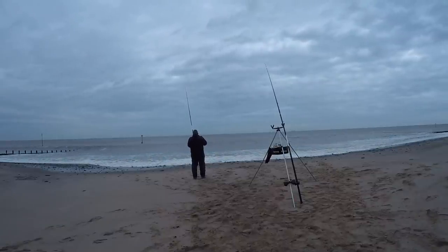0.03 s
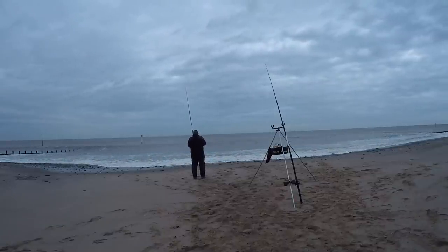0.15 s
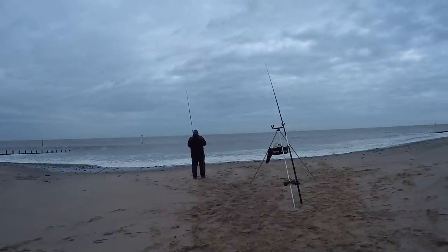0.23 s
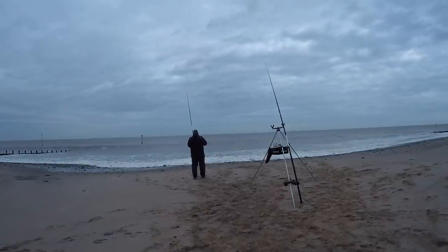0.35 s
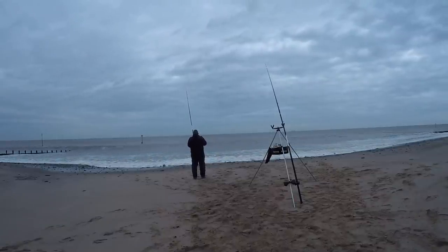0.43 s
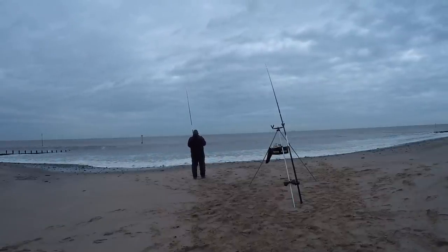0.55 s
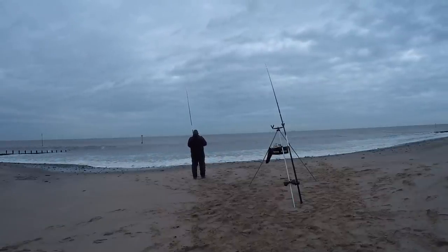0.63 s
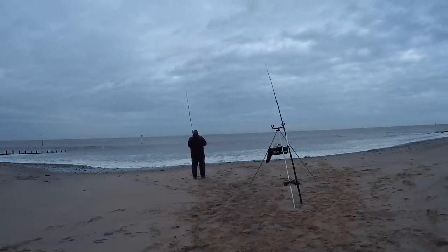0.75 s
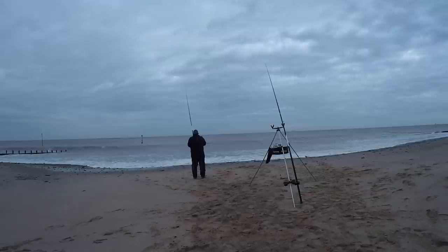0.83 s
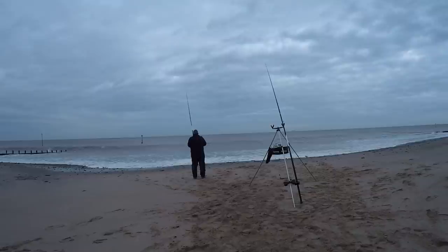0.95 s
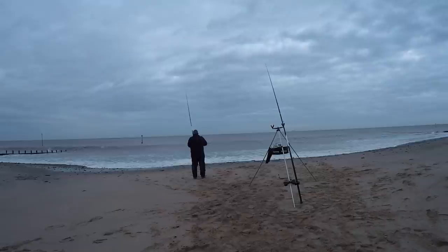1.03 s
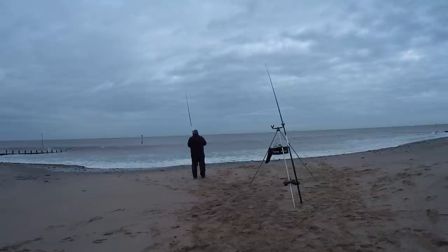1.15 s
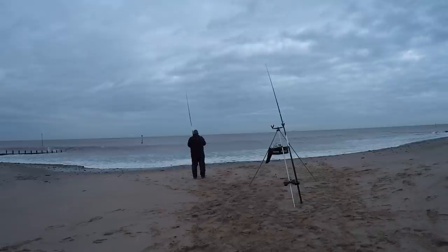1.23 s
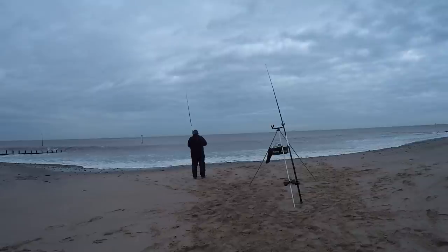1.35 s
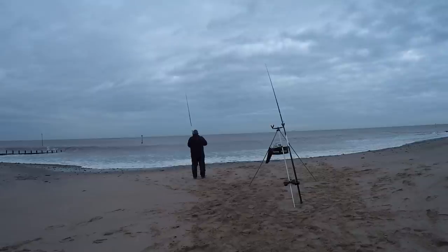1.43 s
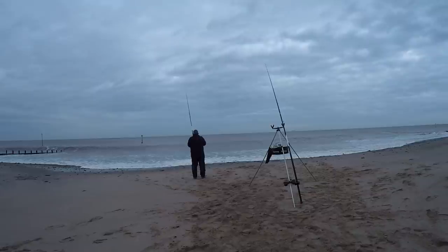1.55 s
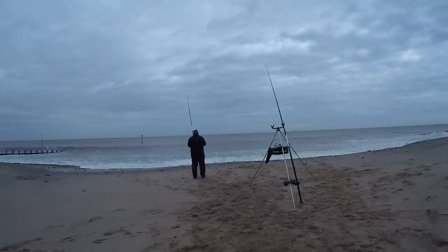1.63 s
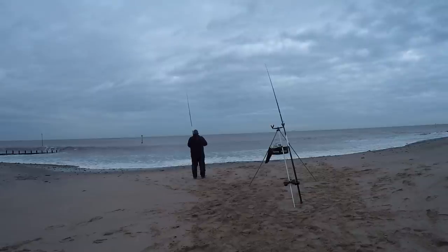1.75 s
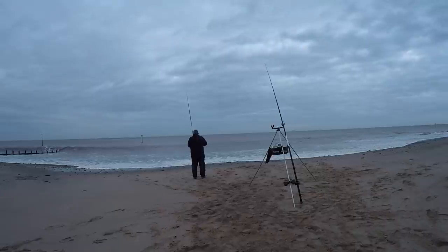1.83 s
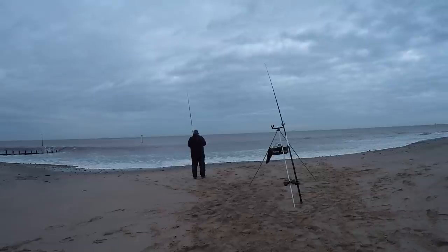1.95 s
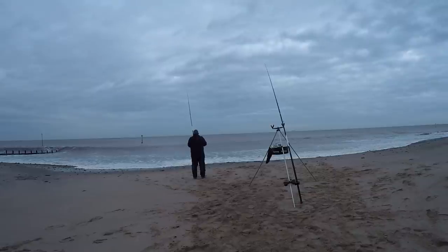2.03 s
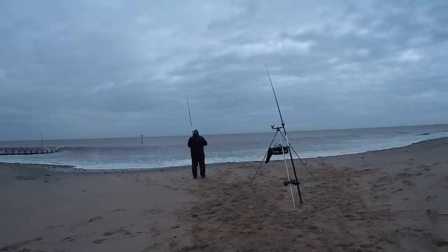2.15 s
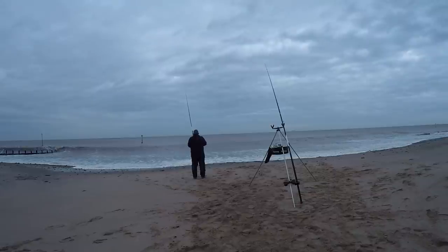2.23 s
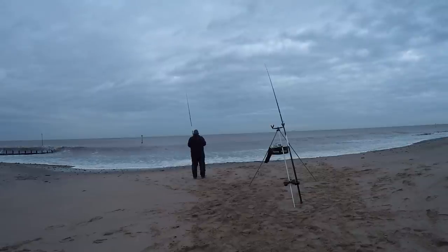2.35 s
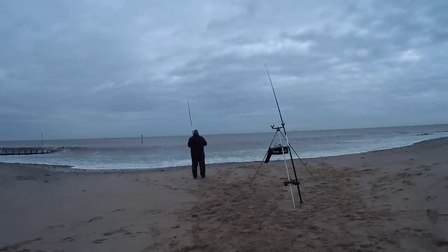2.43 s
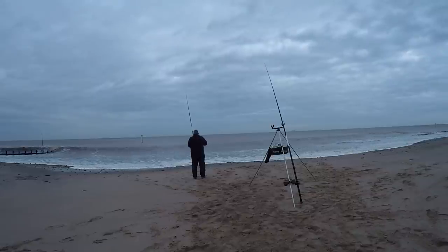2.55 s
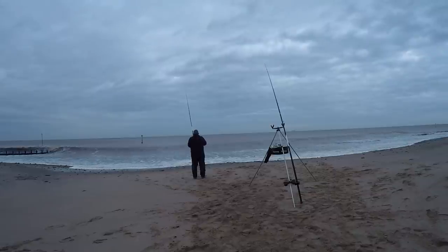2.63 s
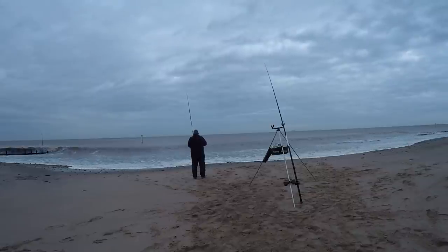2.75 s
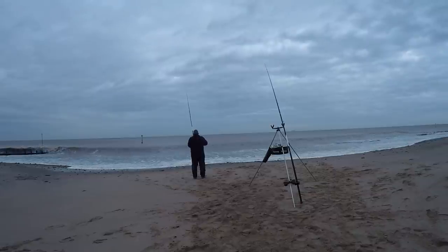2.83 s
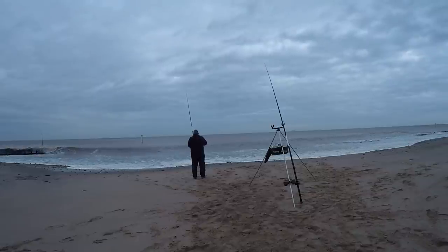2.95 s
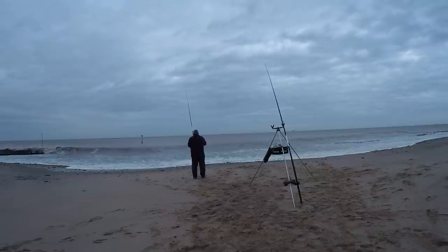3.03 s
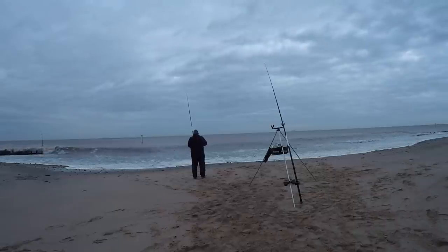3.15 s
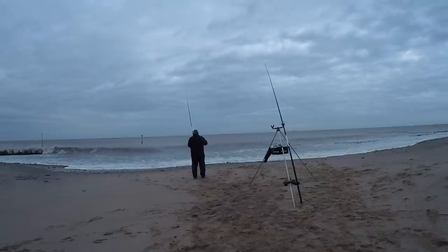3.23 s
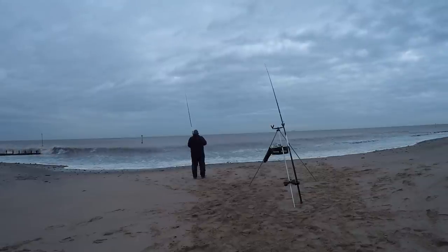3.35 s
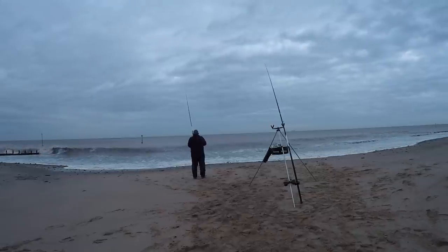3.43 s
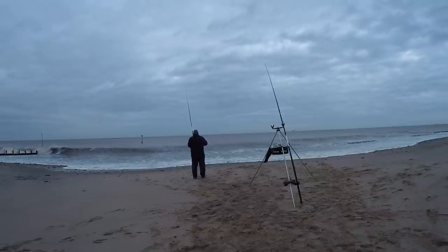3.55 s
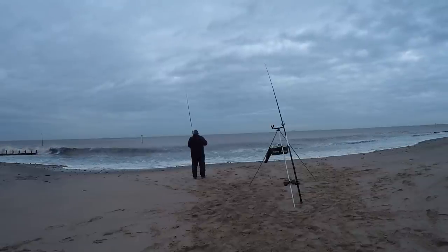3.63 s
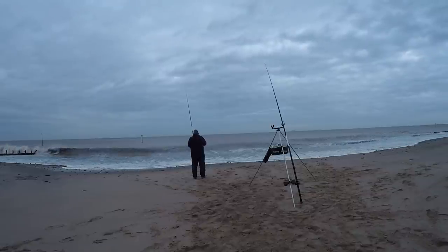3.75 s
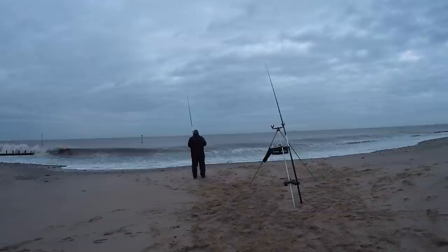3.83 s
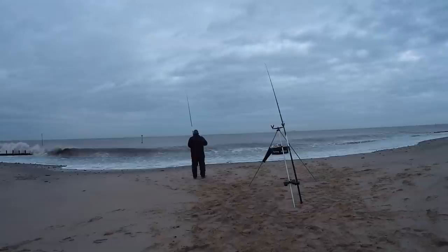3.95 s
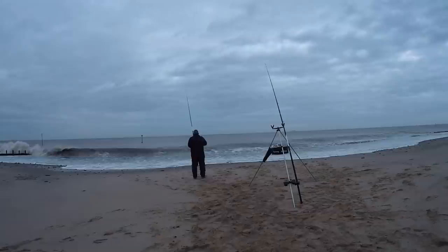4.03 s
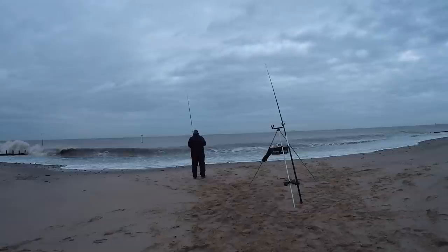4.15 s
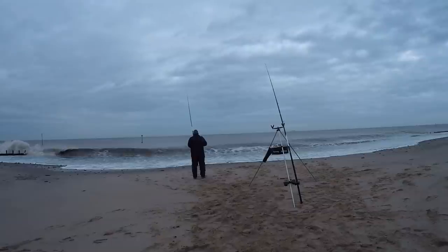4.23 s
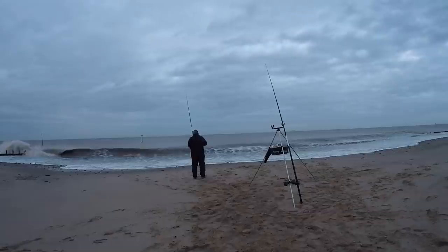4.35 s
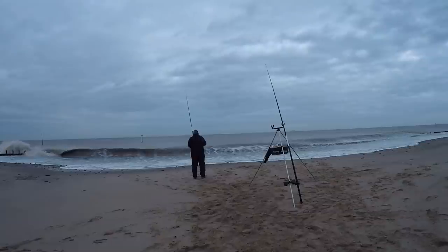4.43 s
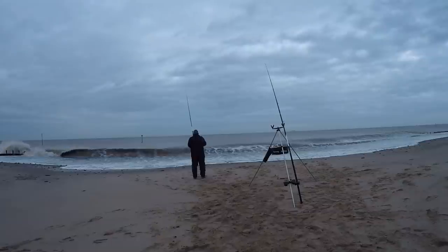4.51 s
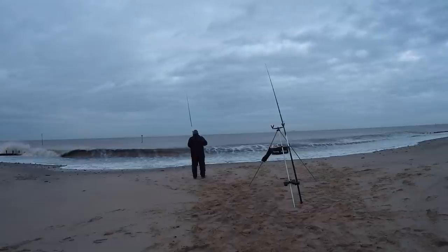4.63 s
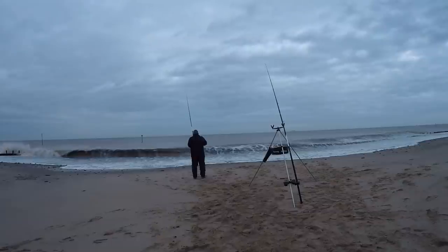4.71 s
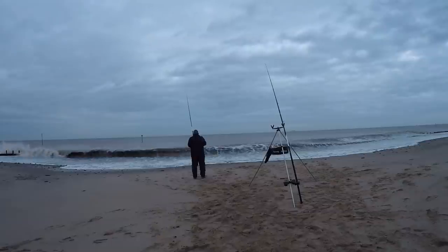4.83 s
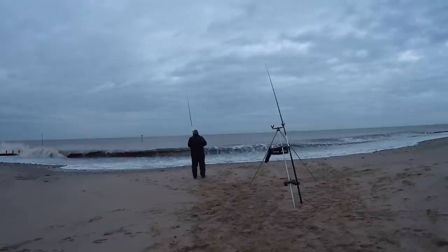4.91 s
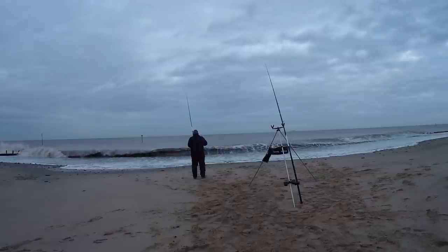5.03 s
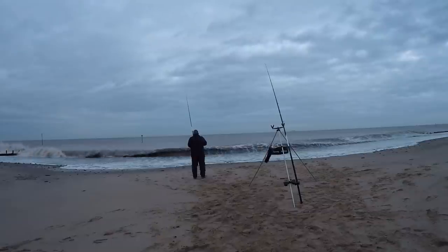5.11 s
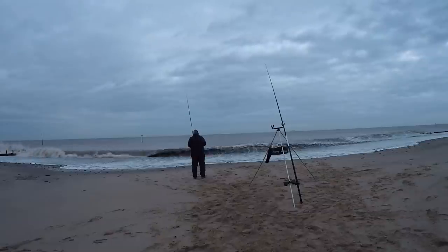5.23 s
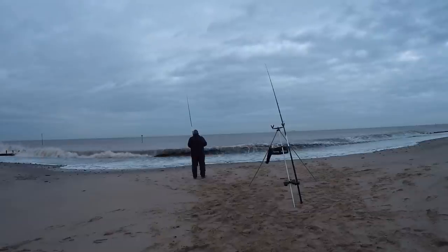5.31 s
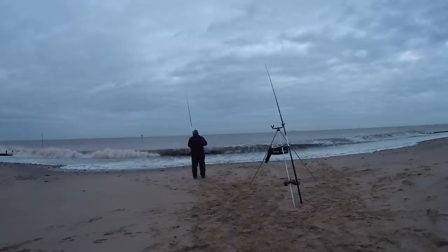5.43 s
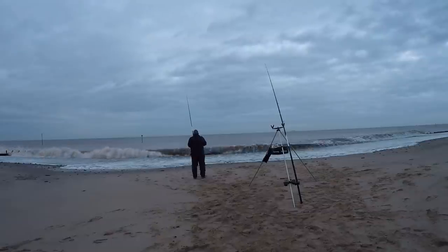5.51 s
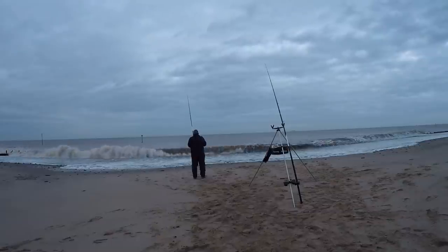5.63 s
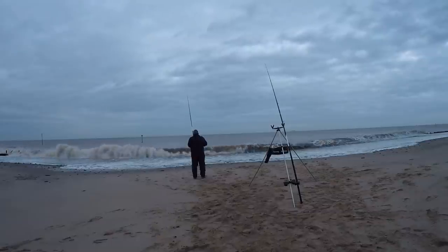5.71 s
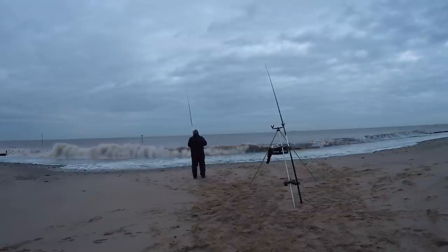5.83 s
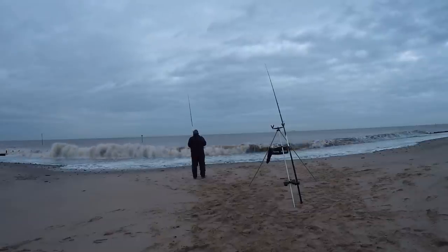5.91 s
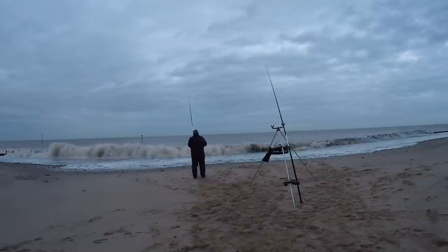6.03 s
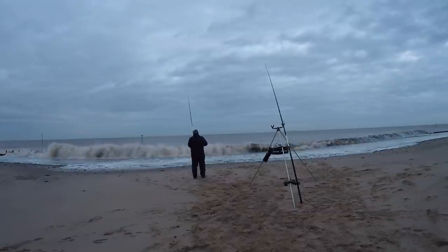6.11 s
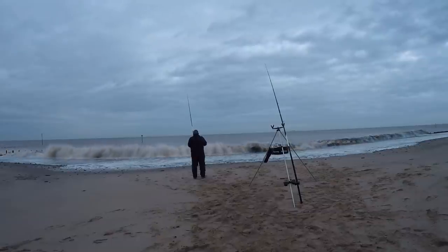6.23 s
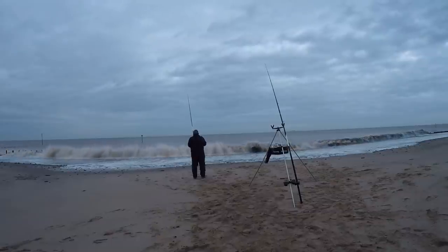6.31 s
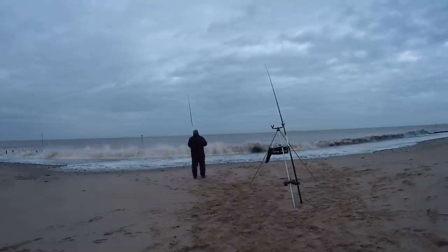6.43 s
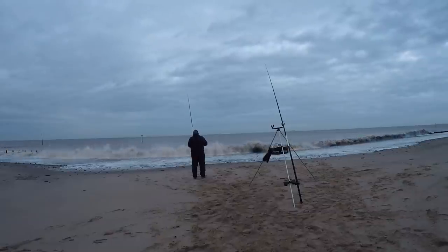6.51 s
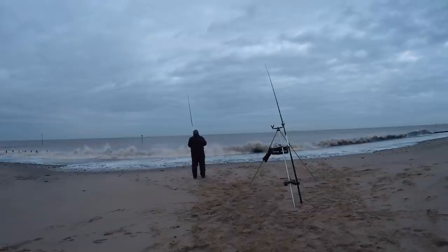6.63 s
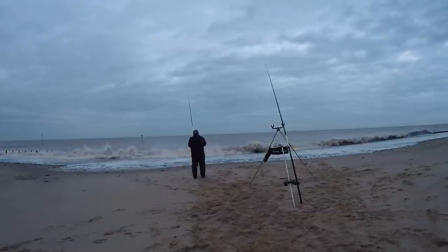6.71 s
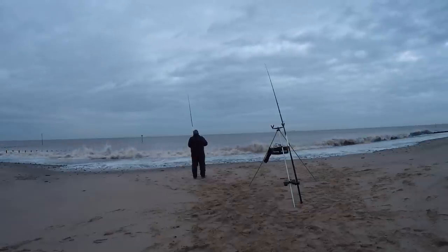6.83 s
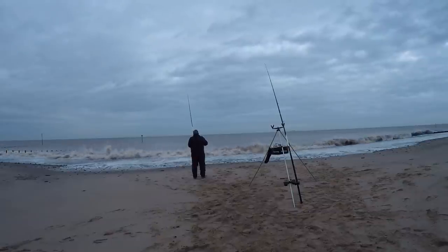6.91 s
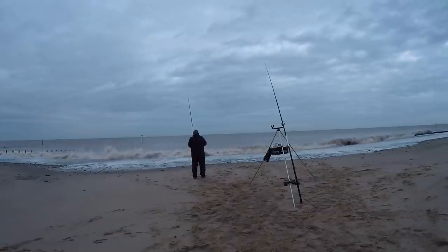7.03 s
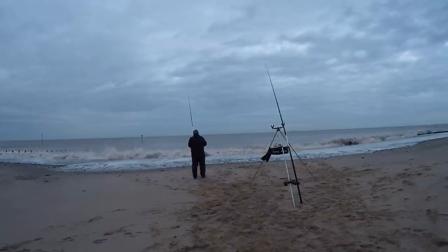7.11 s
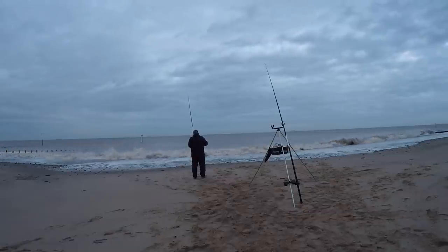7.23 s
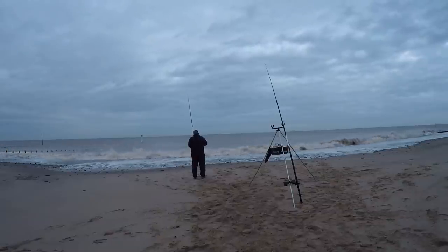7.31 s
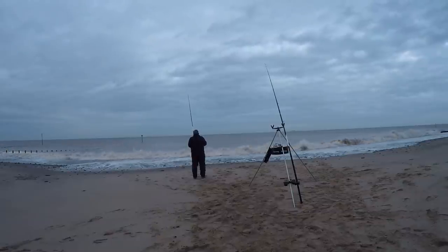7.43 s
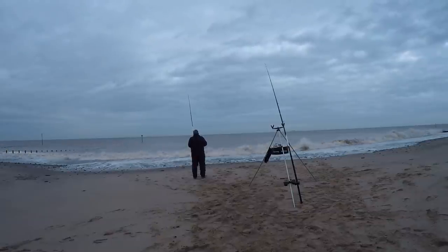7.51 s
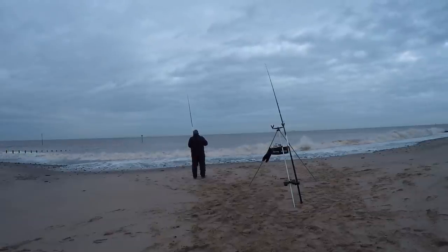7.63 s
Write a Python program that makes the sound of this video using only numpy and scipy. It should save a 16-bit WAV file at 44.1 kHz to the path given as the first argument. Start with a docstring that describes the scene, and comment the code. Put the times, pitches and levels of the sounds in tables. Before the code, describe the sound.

Low wind and surf rumble over a steady distant sea, then a wave slaps wood on the left and breaks along the beach in a foamy roar.

```python
"""An open sandy shore: wind and surf rumble on two close microphone ports over the steady far sea, as shaped noise.
Early on, a small bird chirps once, faintly, as three gliding tones.
A wave then slaps a groyne on the left, in short rushes of bubble pops, and breaks along the beach:
roar, crash, hiss and spray swell together, from clouds of dense pops in six bands.
The spray fades before the roar, and the wave ends towards the right."""
import sys
import numpy as np
from scipy import signal
from scipy.fft import rfft, irfft
from scipy.io import wavfile
from scipy.ndimage import uniform_filter1d

SR = 44100
rng = np.random.default_rng(int(sys.argv[2]) if len(sys.argv) > 2 else 0)


def gain_from_decibels(decibels):
    """Convert decibel values to linear amplitude factors."""
    exponent = np.asarray(decibels, float) / 20
    return 10 ** exponent


def generate_wav(sig):
    """Save sig (samples, or channels by samples) to the path in sys.argv[1] as 16-bit PCM at SR."""
    pcm = np.round(np.clip(np.atleast_2d(sig).T, -1, 1) * 32767).astype(np.int16)
    wavfile.write(sys.argv[1], SR, pcm)


N = 338247
T = np.arange(N) / SR  # seconds
HZ = np.maximum(np.arange(N // 2 + 1) * SR / N, 1)  # frequency of each spectrum bin
OPPOSITE = np.array([[1], [-1]])  # the same sound in opposite sign at the two ports


def shape(x, gain):
    """Linear filtering: multiply the spectrum by a gain over frequency."""
    return irfft(rfft(x) * gain, N)


def colour(points):
    """Spectral envelope: gain over frequency from (Hz, dB) points, straight in dB over log frequency."""
    hz, db = np.transpose(points)
    return gain_from_decibels(np.interp(np.log(HZ), np.log(hz), db))


def window(lo_hz, hi_hz, order=3):
    """Band-pass with soft edges: neighbouring bands add up to even power."""
    low_cut = 1 + (lo_hz / HZ) ** (2 * order)
    high_cut = 1 + (HZ / hi_hz) ** (2 * order)
    return 1 / np.sqrt(low_cut * high_cut)


def unit(x):
    """Normalisation to an rms of 1."""
    return x / np.sqrt(np.mean(x ** 2))


def walk(rate):
    """Slow random modulation: levels held 1 / rate seconds and smoothed twice, rms about 1."""
    hold = int(SR / rate)
    steps = np.repeat(rng.standard_normal(N // hold + 1), hold)
    return unit(uniform_filter1d(uniform_filter1d(steps, hold), hold)[:N])


def curves(table):
    """Linear interpolation in time: each column after the first, one value a sample."""
    s, *columns = np.transpose(table)
    return [np.interp(T, s, column) for column in columns]


def bubbles(share, scatter_db):
    """Shot noise: random pops of uneven size; share is the part of all samples that hold a pop."""
    pops = (rng.random(N) < share) * gain_from_decibels(scatter_db * rng.exponential(size=N))
    return pops * rng.standard_normal(N)


def foam():
    """Dense shot noise: pops so close that they nearly merge."""
    return bubbles(0.6, 1.3)


def spread(alike_hz, least):
    """Spatial coherence: the share that differs between ports grows as waves from a broad front get short."""
    ratio = (HZ / alike_hz) ** 4
    return np.sqrt(least ** 2 + ratio / (1 + ratio))


# Shading and phase at the ports, by direction. Each row: frequency in Hz, left port level in dB,
# right port level in dB, phase by which the left port lags in radians.
FROM_LEFT = [(1500, 0, 0, 0), (2900, -.5, -.5, .02), (4000, 1.5, 1.2, .13), (4800, 0, -2.5, .6),
             (5500, -1.5, -1.5, 1.), (6200, -1, -.5, .95), (7500, 1, 0, .7), (8700, 1, -4.5, 1.5),
             (9300, 1, -3, 2.8), (11500, 0, -1, 3.2), (15000, -2, 2, 3.2)]
FROM_RIGHT = [(1500, 0, 0, 0), (2700, -.3, .3, -.08), (4200, 0, 0, -.3), (6600, -1, .8, -.35),
              (8000, 0, .5, -.6), (9500, .5, -.5, -1.5), (15000, 0, 0, -1.5)]


def heard_from(near, direction):
    """Diffraction: the body around the ports changes level and phase according to direction."""
    hz, left_db, right_db, lag = np.transpose(direction)
    half_turn = np.exp(0.5j * np.interp(np.log(HZ), np.log(hz), lag))
    left = shape(near, colour(np.c_[hz, left_db]) / half_turn)
    right = shape(near, colour(np.c_[hz, right_db]) * half_turn)
    return np.array([left, right])


# Spectrum of the wave. Each row: frequency in Hz, relative density in dB per Hz.
WAVE_COLOUR = [(100, 3.5), (200, -2.5), (450, -7.5), (950, -13.5), (1400, -15.5), (1850, -18), (2500, -23),
               (4350, -26), (5500, -28.5), (7200, -33.5), (9500, -40.5), (11000, -41.5), (13500, -50),
               (15000, -60)]
# Bands of the bubble clouds, big bubbles to small. Each row: lower edge in Hz, upper edge in Hz.
WAVE_HZ = [(150, 450), (450, 1200), (1200, 3000), (3000, 6000), (6000, 9000), (9000, 17000)]
# Where the white water is, the rest being straight ahead. Each row: time in seconds,
# share from the left 0-1, share from the right 0-1, breadth of the front in dB.
BEARING = [(0, 0.01, 0.91, 4), (2.3, 0.02, 0.93, 1), (2.75, 0.94, 0, 0), (4.1, 0.97, 0, -1),
           (5.15, 0.88, 0.01, -1), (5.4, 0.43, 0.03, -10), (5.7, 0.21, 0.03, -10), (6.0, 0.32, 0.01, -3),
           (6.6, 0.25, 0.06, -3.5), (7.0, 0.05, 0.71, 3.5), (7.67, 0.05, 0.72, 2)]


def wave():
    """Superposition: six sizes of bubble cloud, patchy yet surging together, on three stretches of shore."""
    shore, wide, surge = 0, 0, walk(7)
    for band, gain in zip(WAVE_HZ, cloud_gains()):
        tone = colour(WAVE_COLOUR) * window(*band)
        clouds = np.array([shape(foam(), tone) for _ in range(3)])
        patchy_db = 0.32 * surge + 0.82 * walk(12)
        level = gain * gain_from_decibels(patchy_db) / np.std(clouds)
        shore = shore + level * clouds
        wide = wide + level * shape(foam(), tone * spread(11400, 0.051))
    left_share, right_share, breadth_db = curves(BEARING)
    shares = np.array([left_share, right_share, 1 - left_share - right_share])
    # the clouds divide by power, the slaps by amplitude
    left, right, ahead = np.sqrt(shares) * shore + shares * slaps()
    sides = heard_from(left, FROM_LEFT) + heard_from(right, FROM_RIGHT)
    return sides + ahead + OPPOSITE * gain_from_decibels(breadth_db) * wide


# White water. Each row: time in seconds, churning in dB, thrown spray in dB.
WHITE = [(0, -44, -59.5), (1.1, -42, -59), (2.2, -45.5, -62.5), (2.6, -42.5, -53), (2.75, -38, -51),
         (2.9, -38.5, -56), (3.15, -36.5, -50), (3.4, -36.5, -52.5), (4.05, -36.5, -50.5),
         (4.35, -30.5, -47), (5.24, -28.5, -44.5), (5.28, -25.5, -50), (5.55, -23, -43), (5.9, -23.5, -40),
         (6.45, -24, -37.5), (6.8, -23, -38.5), (6.95, -23.5, -41.5), (7.3, -22, -43.5), (7.67, -24, -43.5)]
FULL_CHURN_DB, FULL_SPRAY_DB = -23, -39
# Bubble clouds: roar, crash, wash, hiss, fizz, mist. Each row: level at full churning in dB,
# dB per dB of churning, level at full spray in dB, dB per dB of spray, ever-present lapping in dB.
CLOUDS = [(-21, 0.72, -40, .9, -42), (-22, 1.07, -45, .9, -48), (-28.5, 0.95, -44.5, 2.5, -50),
          (-33, 1.4, -36.5, 3, -51.5), (-57, 3, -38.5, .95, -70), (-66, 2, -45.5, 1.3, -75)]
# Stretches of crest tipping over. Each row: start in seconds, peak level in dB at the loudest pitch,
# rise constant in seconds, fall constant in seconds, loudest pitch in Hz.
SURGES = [(1.15, -36, 0.14, 0.18, 250), (1.68, -31, 0.04, .2, 230), (2.98, -37, .08, 0.073, 1290),
          (3.0, -30, .07, .1, 250), (3.48, -21, 0.045, 0.2, 340), (4.27, -32, .03, .14, 1590),
          (4.46, -31, 0.024, 0.043, 900), (4.91, -33.5, 0.027, 0.051, 1900),
          (5.26, -26.5, .015, 0.14, 2000), (5.46, -22.5, 0.025, 0.029, 800), (5.68, -28.5, 0.036, .1, 600),
          (5.75, -27, .08, .2, 280), (6.5, -20, 0.084, .25, 330), (7.08, -20.5, .06, 0.23, 483),
          (7.42, -18.5, .08, .2, 260)]


def cloud_gains():
    """Incoherent addition: powers of churning, spray, lapping and the surges nearest in pitch sum in each cloud."""
    churn_db, spray_db = curves(WHITE)
    swells = []
    for start, peak_db, rise_s, fall_s, _ in SURGES:
        age = np.maximum(T - start, 0)
        swell = (1 - np.exp(-age / rise_s)) ** 2 * np.exp(-age / fall_s)
        swells.append(gain_from_decibels(peak_db) * swell / swell.max())
    for band, (churned_db, by_churn, sprayed_db, by_spray, lap_db) in zip(WAVE_HZ, CLOUDS):
        churning = gain_from_decibels(churned_db + by_churn * (churn_db - FULL_CHURN_DB))
        spray = gain_from_decibels(sprayed_db + by_spray * (spray_db - FULL_SPRAY_DB))
        power = churning ** 2 + spray ** 2 + gain_from_decibels(lap_db) ** 2
        for swell, (*_, pitch_hz) in zip(swells, SURGES):
            octaves = np.log2(np.sqrt(band[0] * band[1]) / pitch_hz)
            # 7 dB down one octave away, falling with the square of the distance
            power = power + (swell * gain_from_decibels(-7 * octaves ** 2)) ** 2
        yield np.sqrt(power)


# Water slapping down. Each row: time of the peak in seconds, nominal peak of the bright part in dB,
# nominal peak of the dull part in dB (both before the sharing by bearing), decay constant in seconds.
SLAPS = [(2.7556, -21.5, -15, 0.013), (3.1594, -27, -22, 0.013), (3.1994, -31, -25, 0.013),
         (3.5194, -34, -34, 0.013), (4.3036, -31, -23, 0.013), (4.9472, -23, -29, 0.013),
         (5.2699, -26, -21, 0.013), (5.3074, -23, -4.5, 0.011), (5.5094, -15, -2, 0.013)]


def slaps():
    """Transient excitation: each slap is a rush of pops that rises in a few ms and dies away exponentially."""
    crest_db = 14.5  # allowance for peak over rms
    bright, dull = np.zeros(N), np.zeros(N)
    for peak_s, bright_db, dull_db, decay_s in SLAPS:
        age = np.maximum(T - peak_s + 0.007, 0)
        rush = (1 - np.exp(-age / 0.0066)) * np.exp(-age / decay_s)
        rush = rush / rush.max()
        bright += gain_from_decibels(bright_db - crest_db) * rush
        dull += gain_from_decibels(dull_db - crest_db) * rush
    tone = colour(WAVE_COLOUR)
    bright_tone = tone * HZ ** 0.59 * window(1500, 9700, order=5)
    dull_tone = tone * window(320, 2000)
    bright_pops = unit(shape(bubbles(0.55, 1.5), bright_tone))
    dull_pops = unit(shape(bubbles(0.44, 2.5), dull_tone))
    return bright * bright_pops + dull * dull_pops


# Rumble of wind and surf on the ports. Each row: time in seconds, deep rumble in dB,
# upper rumble against deep rumble in dB.
RUMBLE = [(0, -26, -10), (.5, -22, -7.5), (.62, -15.5, -12), (.8, -23.5, -9.5), (1.05, -28, -2),
          (1.25, -30, -0.5), (1.45, -22.5, -5.5), (2.3, -22.5, -8), (2.5, -29.5, -1.5), (2.65, -19, -9),
          (2.8, -20.5, -5.5), (3.03, -16.5, -0.5), (3.18, -18.5, -6.5), (3.32, -15.5, -3.5),
          (3.42, -13, -5.5), (3.56, -19.5, 0.5), (3.7, -15.5, 2), (3.95, -12, -10), (4.25, -17, -8.5),
          (4.45, -17, -3), (4.97, -14, -12), (5.1, -21.5, -8), (5.28, -10.5, -14.5), (5.7, -18, -2.5),
          (6.05, -14, -10), (6.4, -23, -1), (6.85, -18.5, -1), (7.0, -22.5, 2), (7.12, -14.5, -5),
          (7.4, -16.5, -4), (7.67, -15, -10)]
# Spectrum of the rumble. Each row: frequency in Hz, relative density in dB per Hz.
RUMBLE_COLOUR = [(5.9, -40), (10, 5), (27, 4), (70, -5.5), (188, -21), (229, -20), (300, -18), (390, -50),
                 (660, -120)]
# Bands of the deep and the upper rumble. Each row: lower edge in Hz, upper edge in Hz.
RUMBLE_HZ = [(8, 60), (60, 150)]


def rumble():
    """Coherent pressure: deep and upper rumble of wind and surf, nearly alike at both ports, flutter independently."""
    out = 0
    deep_db, upper_over_deep_db = curves(RUMBLE)
    for band, db in zip(RUMBLE_HZ, (deep_db, deep_db + upper_over_deep_db)):
        tone = colour(RUMBLE_COLOUR) * window(*band)
        both, apart = (unit(shape(rng.standard_normal(N), tone)) for _ in range(2))
        flutter_db = 1.25 * walk(14)
        out = out + gain_from_decibels(db + flutter_db) * (both + 0.036 * apart * OPPOSITE)
    return out


# Bird notes. Each row: start in seconds, end in seconds, start pitch in Hz, end pitch in Hz, level in dB.
CHIRP = [(.297, .311, 4400, 4750, -49), (.319, .345, 4450, 3600, -48), (.356, .38, 3300, 3850, -48.5)]


def bird():
    """Frequency modulation: three short whistles whose pitch glides linearly."""
    out = np.zeros(N)
    for start, end, start_hz, end_hz, db in CHIRP:
        part = np.clip((T - start) / (end - start), 0, 1)
        swell = np.sqrt(np.abs(np.sin(np.pi * part))) * (part < 1)
        pitch_hz = start_hz + (end_hz - start_hz) * part
        out += gain_from_decibels(db) * swell * np.sin(2 * np.pi * np.cumsum(pitch_hz) / SR)
    return out


# Spectrum of the far sea. Each row: frequency in Hz, relative density in dB per Hz.
SEA_COLOUR = [(59, -17), (100, 1), (192, -8.5), (274, -13), (462, -23), (513, -22), (797, -27.5),
              (1770, -32), (2000, -29.5), (4730, -40), (15000, -64)]


def sea():
    """Diffuse field: far surf all along the shore is smooth, broad noise that slowly breathes."""
    tone = colour(SEA_COLOUR)
    near = shape(rng.standard_normal(N), tone)
    wide = shape(rng.standard_normal(N), tone * spread(5200, 0.1))
    level = gain_from_decibels(-33.5 + 0.44 * walk(2.9)) / np.std(near)
    return level * (heard_from(near, FROM_RIGHT) + OPPOSITE * wide)


def scene():
    """Linear superposition of all sources at the two ports."""
    return rumble() + wave() + sea() + bird()


def band_limit(x):
    """A steep low-pass at the top of the band."""
    return signal.sosfilt(signal.butter(12, 15150, fs=SR, output="sos"), x)


def record(dry):
    """Transduction: two unequal capsules, the left weaker below the treble but deeper, hiss and round peaks."""
    weak = gain_from_decibels(-1.6 / (1 + (HZ / 1150) ** 4))  # left against right
    # first-order low cuts at 3 Hz and 8 Hz
    left = shape(dry[0], np.sqrt(weak) * 1j * HZ / (1j * HZ + 3))
    right = shape(dry[1], 1 / np.sqrt(weak) * 1j * HZ / (1j * HZ + 8))
    hiss = gain_from_decibels(-57) * rng.standard_normal((2, N))
    mix = np.tanh(0.81 * (np.array([left, right]) + hiss)) / 0.79
    return band_limit(mix)


dry = scene()
out = record(dry)
generate_wav(out)
```